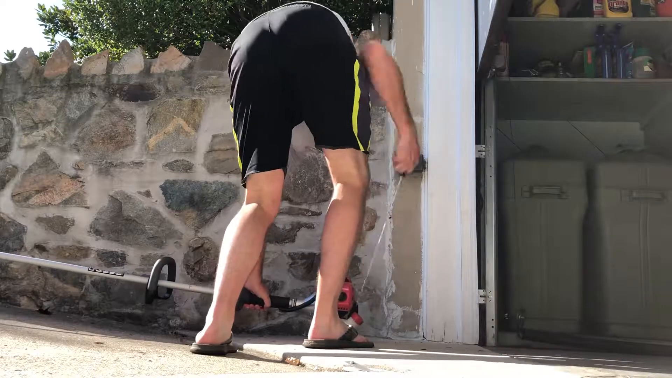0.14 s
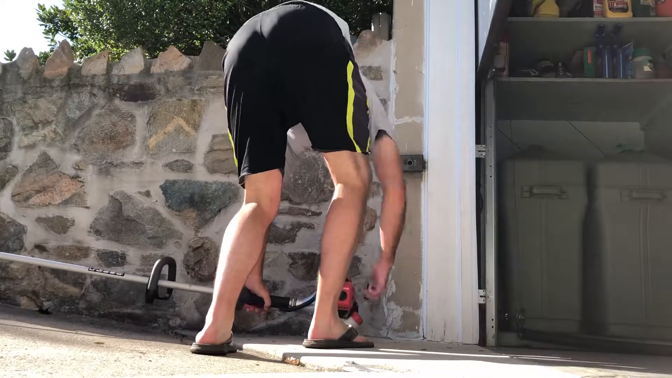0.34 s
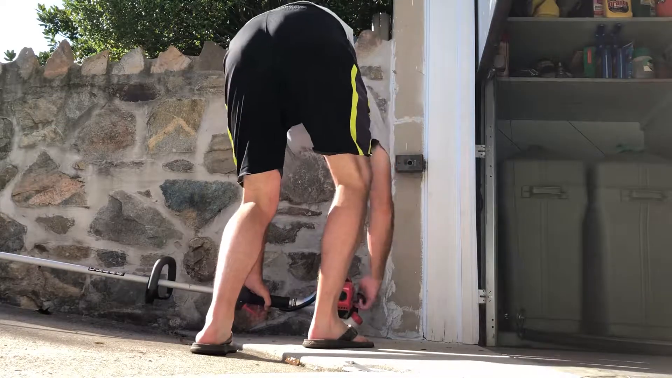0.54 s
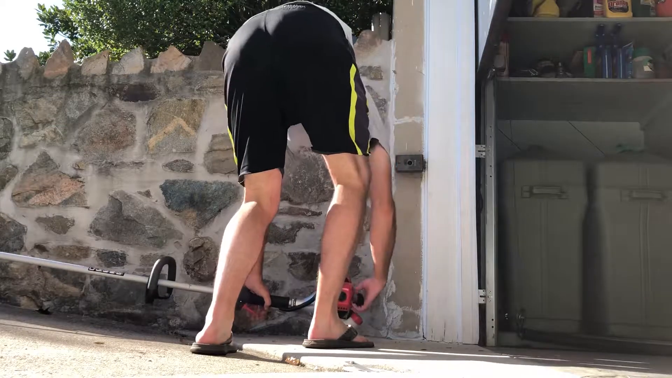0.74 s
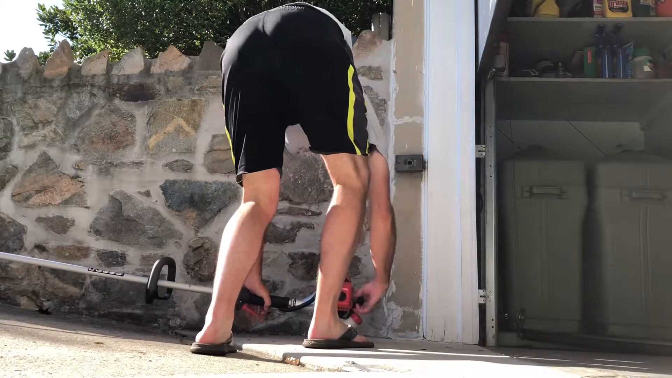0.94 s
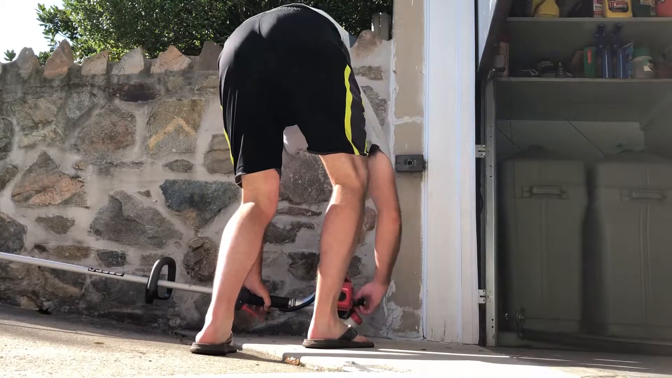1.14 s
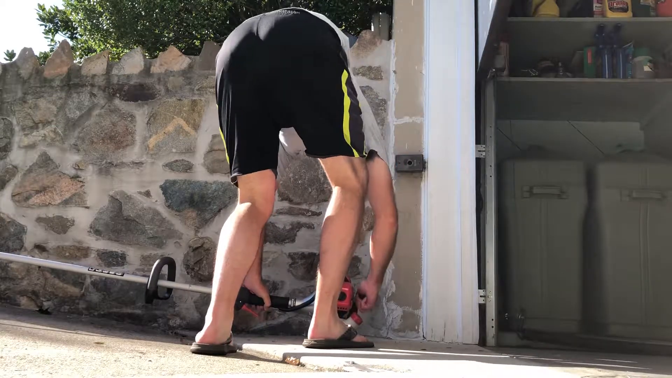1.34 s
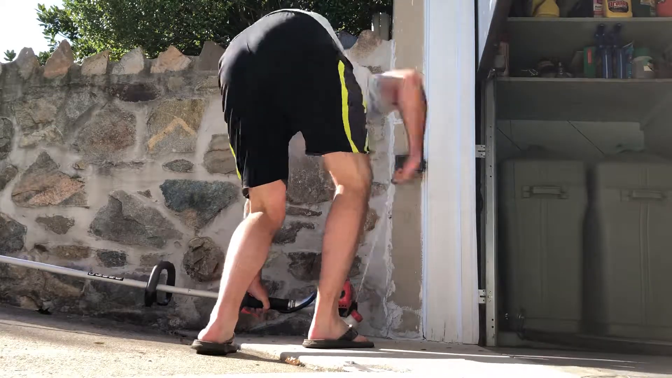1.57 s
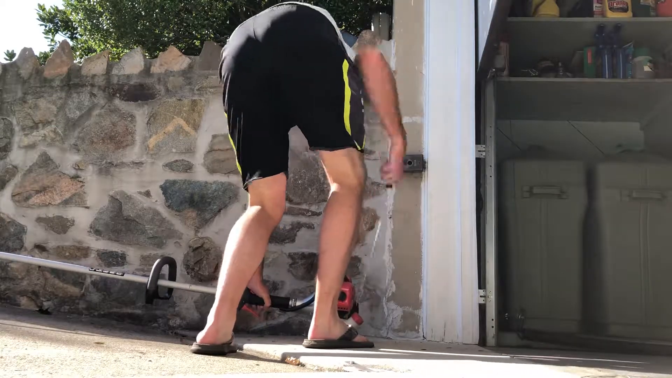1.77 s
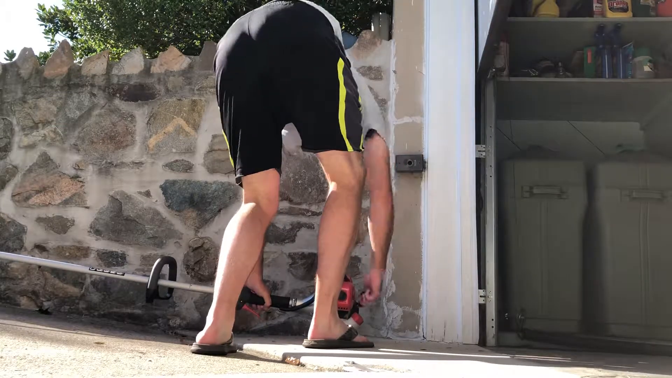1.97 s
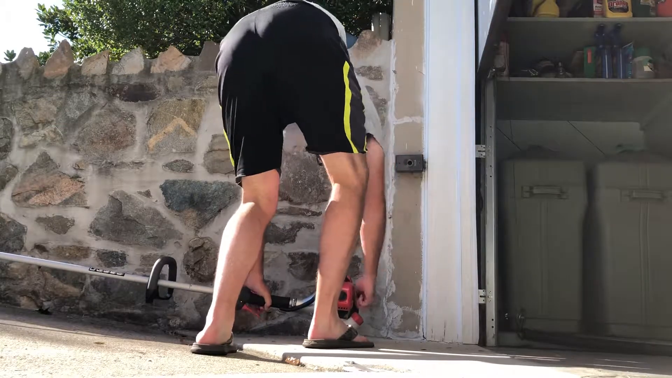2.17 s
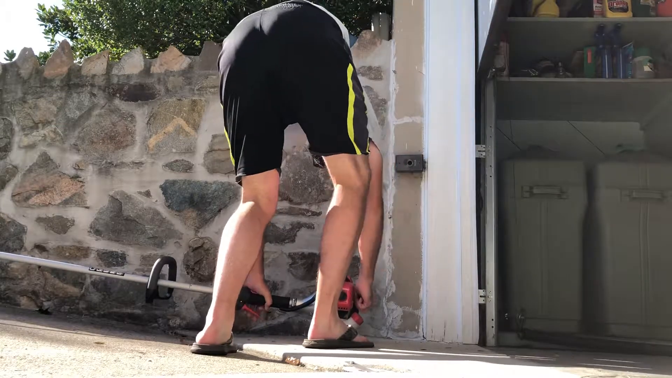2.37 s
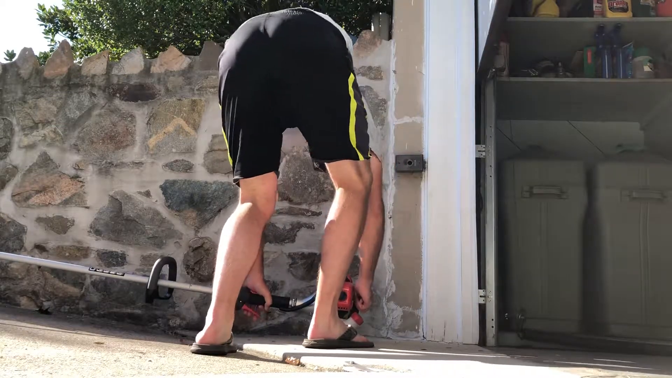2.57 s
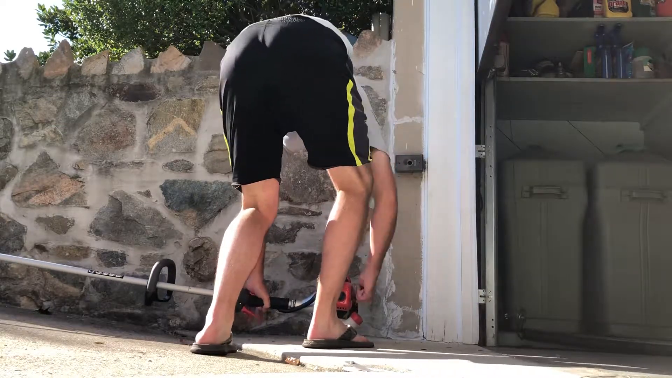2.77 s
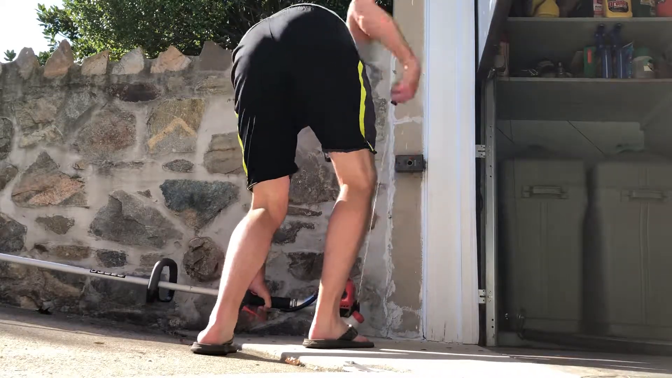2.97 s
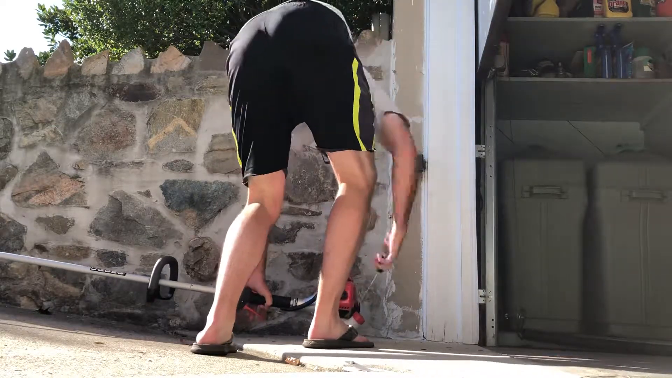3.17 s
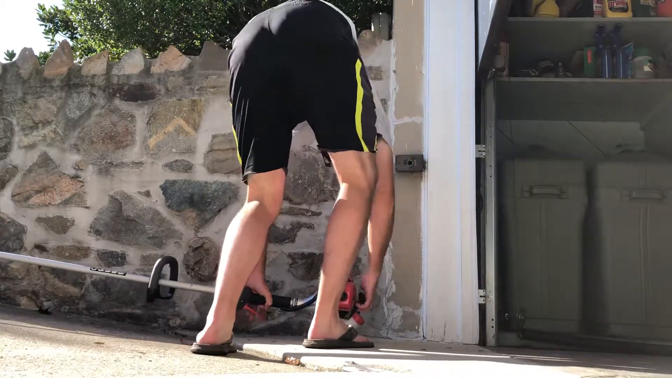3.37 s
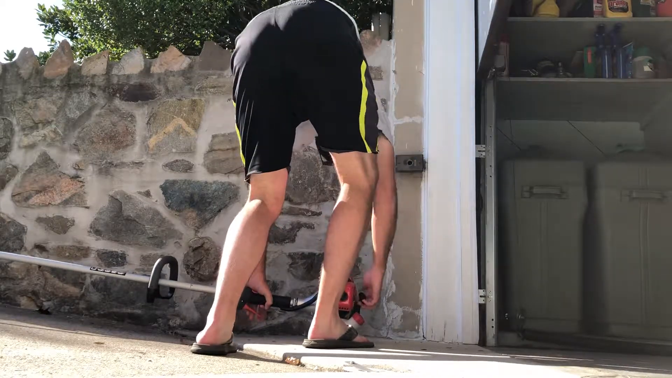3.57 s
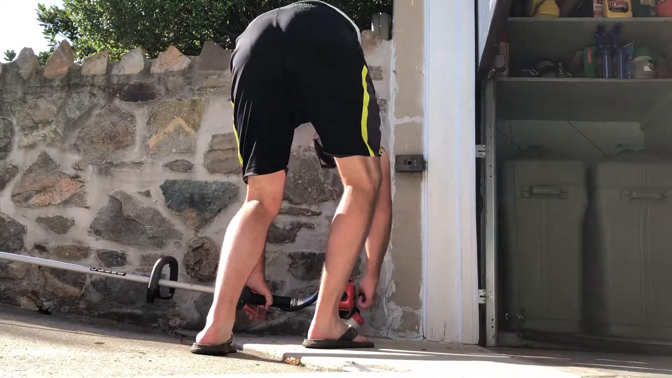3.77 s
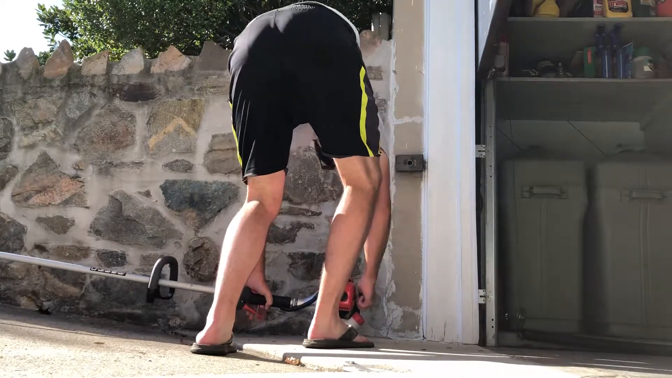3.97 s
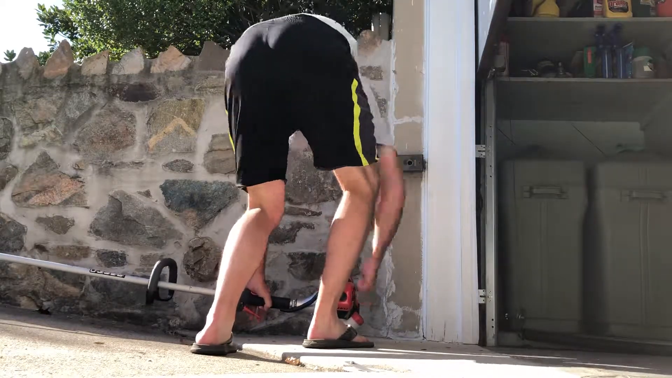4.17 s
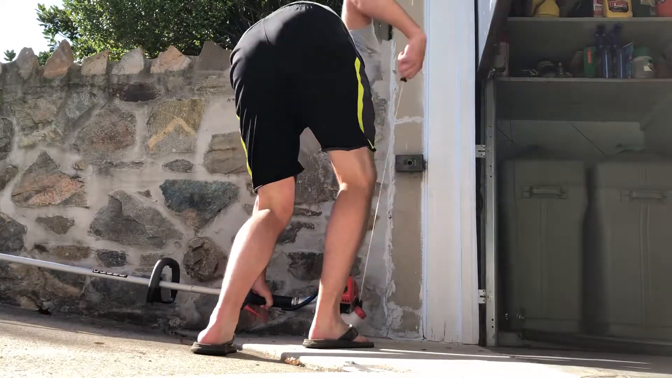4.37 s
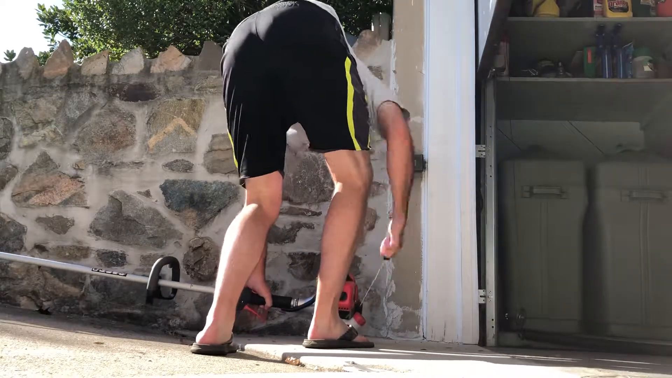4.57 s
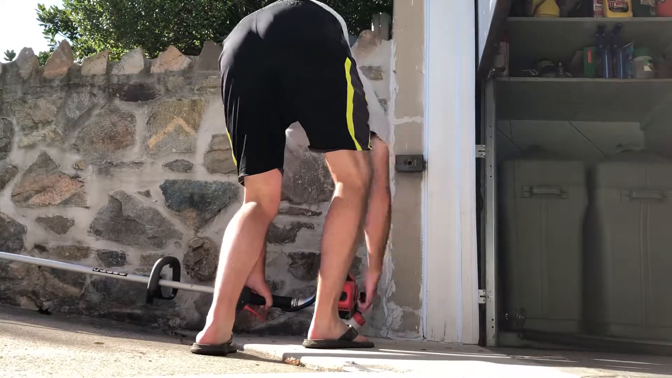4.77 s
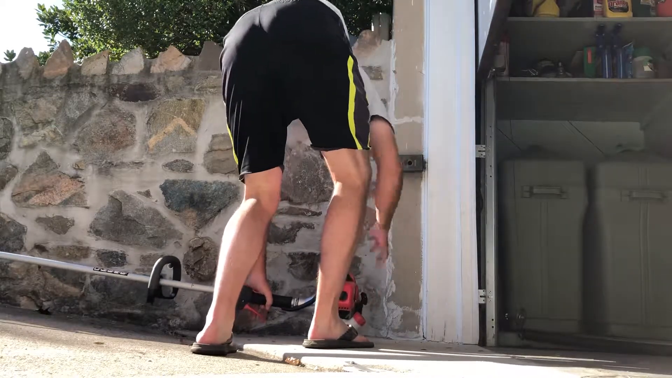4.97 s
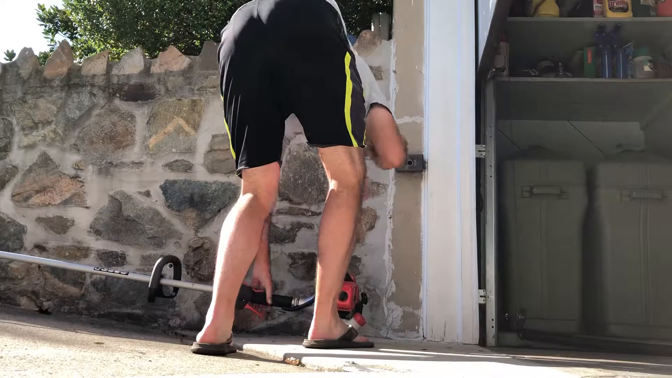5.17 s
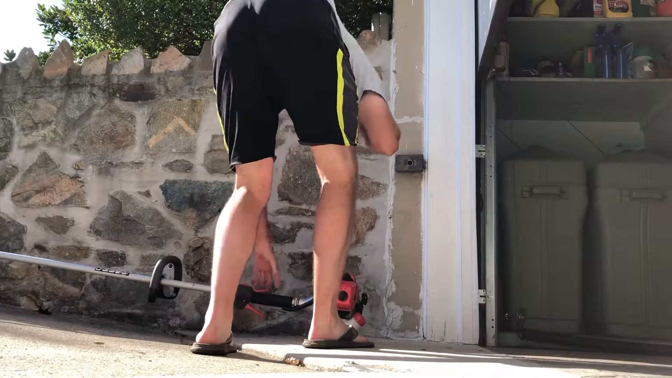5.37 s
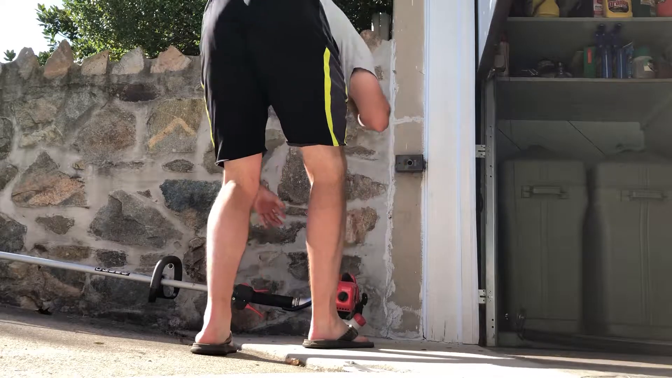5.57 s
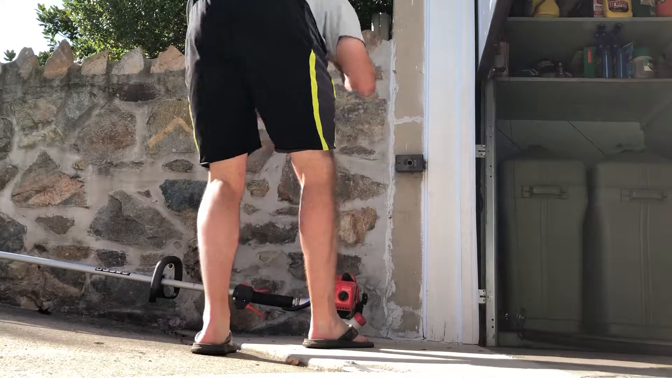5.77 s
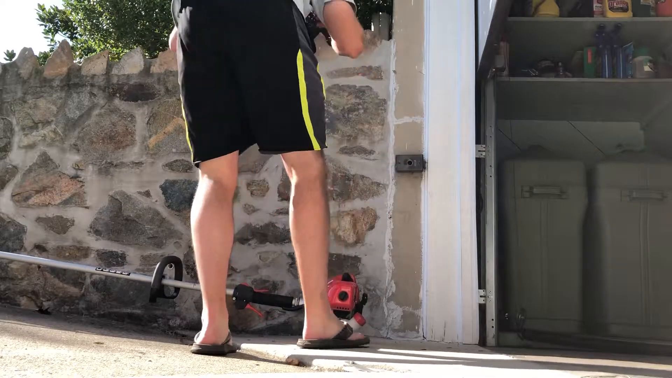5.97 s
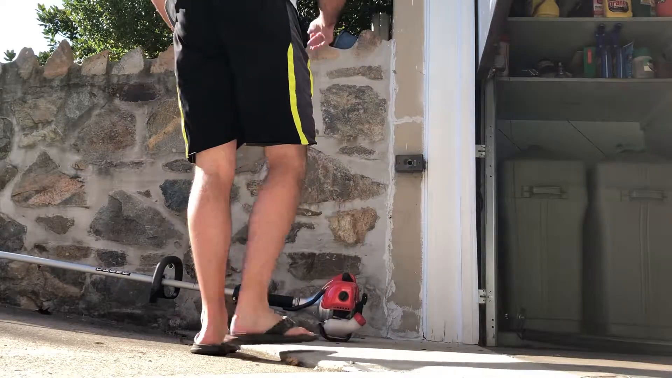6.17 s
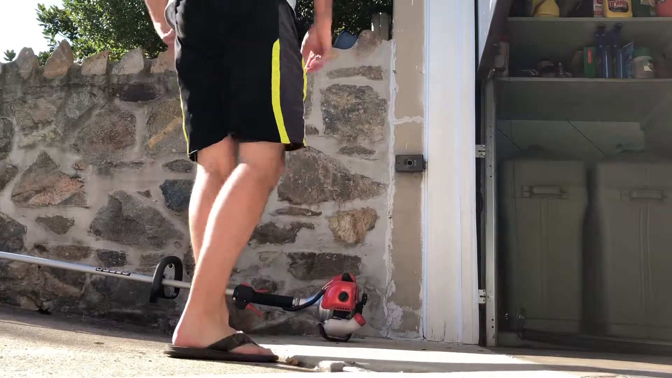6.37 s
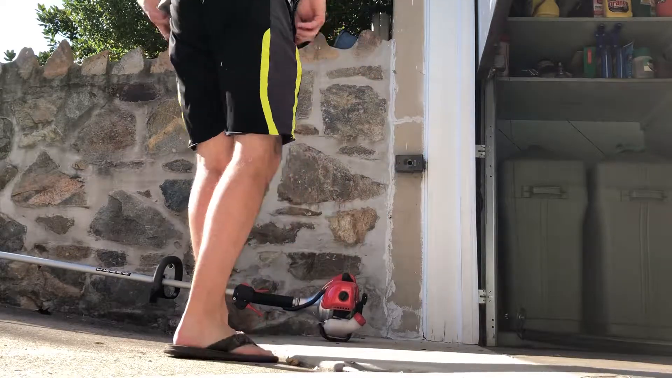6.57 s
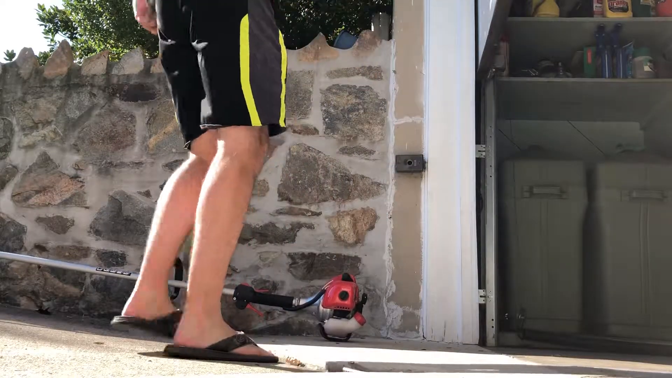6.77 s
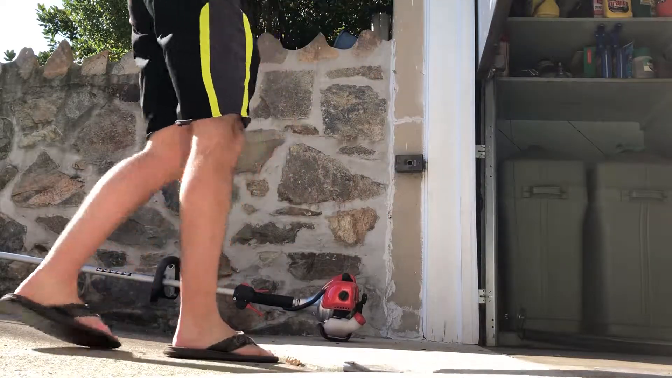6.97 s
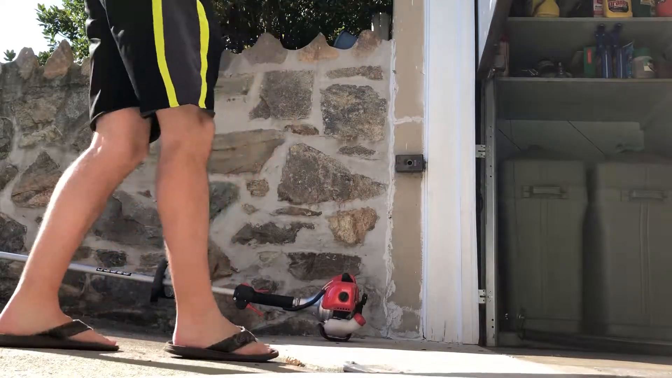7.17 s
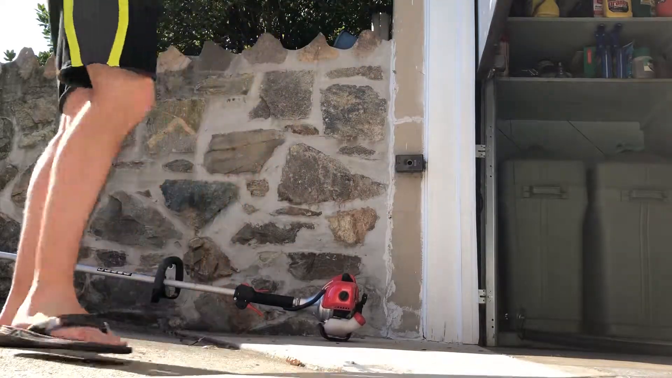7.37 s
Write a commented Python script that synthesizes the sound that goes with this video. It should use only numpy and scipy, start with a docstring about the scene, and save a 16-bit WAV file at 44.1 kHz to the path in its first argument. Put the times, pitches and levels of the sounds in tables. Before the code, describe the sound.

A small two-stroke engine is yanked by its cord three times, sputtering and dying with metallic clacks, then catches and idles in uneven, sharp pops.

```python
"""Between a stone wall and an open garage, a two-stroke string trimmer is pull-started on the ground.
Three pulls spin it up, it pops a few times and runs down with clacks of the starter; on the fourth it catches.
It idles unevenly: every turn puffs through muffler modes, only about every fifth fires with a sharp noise crack.
Cord and metal are coloured noise under envelopes; behind are rumble, a droning motor, an insect and a bird."""
import sys
import numpy as np
from scipy import signal
from scipy.fft import rfft, irfft, next_fast_len
from scipy.io import wavfile

SR = 44100
rng = np.random.default_rng(int(sys.argv[2]) if len(sys.argv) > 2 else 0)


def wrap_up_sound(samples):
    """Save the sound to the file named by the first command line argument, as 16-bit audio."""
    columns = np.atleast_2d(samples).T
    # keep every value between -1 and 1, then stretch to whole-number steps
    tamed = np.clip(columns, -1, 1)
    steps = np.round(tamed * 32767).astype(np.int16)
    wavfile.write(sys.argv[1], SR, steps)


N = 327663
TIME = np.arange(N) / SR


def from_db(db):
    """Decibels to gain."""
    return 10 ** (np.asarray(db) / 20)


def rms_one(x):
    """Scale to rms 1."""
    return x / np.sqrt(np.mean(x ** 2) + 1e-20)


def in_time(rows):
    """Each column of a curve at every sample, the first column being seconds."""
    s, *columns = np.transpose(rows)
    return [np.interp(TIME, s, c) for c in columns]


def cut(x, hz, kind, order=2):
    """Butterworth low- or high-pass."""
    sos = signal.butter(order, min(hz, .45 * SR), kind, fs=SR, output="sos")
    return signal.sosfilt(sos, x + 1e-18)


def drift(per_s):
    """Straight lines between standard normal draws; holds still after 2000 draws."""
    return np.interp(TIME * per_s, np.arange(2000), rng.standard_normal(2000))


def noise(spectrum):
    """Noise of a given colour, rms 1, falling steeply below its first point."""
    hz, db = np.transpose(spectrum)
    size = next_fast_len(N)
    f = np.maximum(np.arange(size // 2 + 1) * SR / size, 1)
    gain = from_db(np.interp(np.log(f), np.log(hz), db)) * np.minimum(f / hz[0], 1) ** 2
    white = rng.standard_normal(size)
    return rms_one(irfft(rfft(white) * gain, size)[:N])


def shifting(x, db, per_s, count=12):
    """The colour changes from moment to moment: each band has a drifting gain of its own; rms 1."""
    size = next_fast_len(N)
    spectrum = rfft(x, size)
    f = np.arange(len(spectrum)) * SR / size
    centres_hz = np.linspace(np.sqrt(1000), np.sqrt(15000), count) ** 2
    place = np.interp(f, centres_hz, np.arange(count))
    out = np.zeros(N)
    for k in range(count):
        band = irfft(spectrum * np.maximum(1 - abs(place - k), 0), size)[:N]
        out += band * from_db(db * drift(per_s))
    return rms_one(out)


def clicks(times, gains):
    """One impulse at each time."""
    return np.bincount(np.maximum(np.asarray(times) * SR, 0).astype(int), gains, N)[:N]


def ring(x, modes):
    """Parallel modes of alternating sign; a unit click rings each at its own level."""
    out = np.zeros(N)
    for k, (hz, db, t60) in enumerate(modes):
        radius = np.exp(-np.log(1000) / (t60 * SR))
        w = 2 * np.pi * hz / SR
        poles = [1, -2 * radius * np.cos(w), radius * radius]
        out += (-1) ** k * from_db(db) * signal.lfilter([.5, 0, -.5], poles, x + 1e-18)
    return out


def bursts(times, db, rise_s, fall_s):
    """An envelope that swells and dies away at each time."""
    out = np.zeros(N + SR)
    t = TIME[:SR // 5]
    for s, gain, rise, fall in np.broadcast(times, from_db(db), rise_s, fall_s):
        at = max(int(s * SR), 0)
        swell = np.minimum(t / rise, 1) ** 2
        out[at:at + len(t)] += gain * swell * np.exp(-np.maximum(t - rise, 0) / fall)
    return out[:N]


def ticking(per_s, db, spread_db, fall_s):
    """Envelope of tiny metal ticks at uneven times and strengths."""
    chance = rng.random((2000, 2))
    s = np.cumsum(2 * chance[:, 0]) / per_s
    heard = s < TIME[-1]
    return bursts(s[heard], db - spread_db * chance[heard, 1], rise_s=0.00023, fall_s=fall_s)


# Distant rumble. Each row: frequency in Hz, relative density in dB per Hz.
AIR_SPECTRUM = [(30, -44), (50, -16), (82, -2.5), (110, -8.5), (140, -3.5), (175, -10), (260, -12.5),
                (370, -22.5), (560, -21), (1020, -21), (2100, -42), (4600, -51), (7000, -56.5),
                (16000, -61)]


def rumble(level_db=-42.5):
    """Low-weighted air noise of slightly drifting level."""
    return from_db(level_db + drift(4.0)) * noise(AIR_SPECTRUM)


# Far motor, fading. Each row: time in seconds, level of the fundamental in dB before its drift.
DRONE_LEVEL = [(0, -40), (1.4, -43), (2.2, -41), (2.7, -44), (2.85, -65)]


def far_motor(drone_hz=140.5):
    """Partials at 1, 1.5 and 2 times a wavering pitch."""
    half_turn = np.pi * np.cumsum(drone_hz * (1 + .012 * drift(14))) / SR
    partials = np.sin(2 * half_turn) + .35 * np.sin(3 * half_turn) + .25 * np.sin(4 * half_turn)
    return from_db(in_time(DRONE_LEVEL)[0] + 2 * drift(9)) * partials


# Insect in the hedge. Each row: time in seconds, mid-chirp pitch in Hz, chirp peak in dB, both before drift.
INSECT_TRACK = [(0, 7900, -72), (1.5, 7780, -67.5), (2.15, 8000, -58), (2.4, 8080, -56),
                (2.46, 7800, -73.5)]


def insect(chirps_per_s=17, glide_hz=60, uneven_db=4):
    """A sine pulsed into chirps that each sag in pitch."""
    hz, db = in_time(INSECT_TRACK)
    phase = np.cumsum(chirps_per_s + drift(4.2)) / SR % 1
    pitch_hz = hz + glide_hz * (1 - 2 * phase) + 70 * drift(900)
    tone = np.sin(2 * np.pi * np.cumsum(pitch_hz) / SR)
    return from_db(db + uneven_db * drift(16)) * np.sin(np.pi * phase) ** 4 * tone


# Two blurred notes of a far bird. Each row: frequency in Hz, relative density in dB per Hz.
BIRD_SPECTRUM = [(2600, -25), (3100, 3), (3800, -12), (4700, -2), (5400, -25), (9000, -50)]
# Bird calls. Each entry: start in seconds.
BIRD_START_S = [1.17, 1.44, 2.27, 2.53]


def bird(level_db=-66):
    """Noise in two bands, swelling and dying at each call."""
    return noise(BIRD_SPECTRUM) * bursts(BIRD_START_S, level_db, rise_s=.03, fall_s=.075)


# Reflections off ground, wall and garage. Each row: delay in ms, level in dB.
REFLECTIONS = [(1.7, -14.5), (6.6, -16), (12.6, -18), (19.5, -15.5), (24, -17), (35.5, -13)]


def yard(x, tail_db=-8, t60_s=0.52, tail_low_hz=330, tail_high_hz=9000, build_s=0.004):
    """A few hard reflections, then the diffuse ring of the garage."""
    out = x.copy()
    for ms, db in REFLECTIONS:
        out += from_db(db) * np.interp(TIME - ms / 1000, TIME, x, left=0)
    t = TIME[:SR]
    decay = np.exp(-np.log(1000) * t / t60_s)
    tail = rng.standard_normal(SR) * decay * np.minimum(t / build_s, 1) ** 2
    tail = cut(tail / np.linalg.norm(tail), tail_low_hz, "high", order=1)
    tail = cut(tail, tail_high_hz, "low", order=1)
    return out + from_db(tail_db) * signal.fftconvolve(x, tail)[:N]


# Pulls of the cord. Each row: first stroke in seconds, last stroke in seconds, cord wound back in seconds,
# top speed in turns/s, drag in turns/s per s, rasp in dB before the cord gain.
CORD_PULLS = [(0.0176, 0.633, .79, 53.6, 150, -35.5), (1.638, 1.953, 2.05, 51.5, 149, -36.5),
              (2.921, 3.364, 3.44, 55.1, 119, -38), (4.339, 7.44, 4.42, 55, 115.5, -38.5)]


def since_pull(grip_s=.05):
    """At every sample: seconds since the first stroke of the current pull, and that pull's row."""
    pulls = np.array(CORD_PULLS)
    index = np.searchsorted(pulls[:, 0] - grip_s, TIME) - 1
    current = pulls[np.maximum(index, 0)]
    return np.maximum(TIME - current[:, 0], 0), current


# Firings of the charge. Each row: time in seconds, hiss in dB, bark in dB, both before the gains in cracks().
FIRED = [(0.2086, -12, -26.5), (0.2855, -7.5, -25), (0.31, -14, -37), (.3552, -23, -37), (.4289, -26, -33),
         (.484, -16.5, -28.5), (.5953, -30, -37), (3.1461, -4, -25.5), (3.3212, -11.5, -27),
         (4.4949, -8.5, -27.5), (4.595, -3.5, -24), (4.741, -7.5, -24.5), (4.8635, -7.5, -22),
         (4.993, -7, -25), (5.1141, -5, -25), (5.2324, -3.5, -24.5), (5.3451, -4, -27), (5.4581, -3.5, -24),
         (5.5764, -9.5, -24), (5.673, -6.5, -21.5), (5.794, -11.5, -30), (5.911, -8, -25.5),
         (6.0212, -2.5, -21.5), (6.1327, -8, -24), (6.2423, -2, -24.5), (6.349, -6, -21.5),
         (6.4554, -3.5, -21), (6.564, -5.5, -22.5), (6.6715, -7.5, -21), (6.7582, -7.5, -29.5),
         (6.8076, -4, -24.5), (6.8989, -5, -18.5), (6.993, -4, -25.5), (7.0807, -3, -20), (7.1499, -3, -22),
         (7.2384, -4, -30), (7.3311, -4, -22.5), (7.416, -4, -18)]
# Wandering idle speed. Each row: time in seconds, speed in turns/s.
IDLE_SPEED = [(4.74, 41.8), (4.9, 40), (5.2, 43.2), (5.8, 41.3), (6.4, 45.6), (6.9, 42), (7.43, 41.3)]
IDLE_FROM_S = 4.73


def crank_speed(tug_s=.043, tug_turns_per_s=10.43, kick_turns_per_s=9.1, stall_turns_per_s=14.7):
    """Turns/s: the tug spins the crank up, drag slows it, firings kick it on until it idles."""
    age, pull = since_pull()
    first, _, _, top, drag, _ = pull.T
    fired = np.sort(np.array(FIRED)[:, 0])
    kicks = np.searchsorted(fired, TIME) - np.searchsorted(fired, first)
    speed = top - tug_turns_per_s * np.maximum(1 - age / tug_s, 0)
    speed += kick_turns_per_s * kicks - drag * np.maximum(age - tug_s, 0)
    return np.where(TIME < IDLE_FROM_S, np.maximum(speed, stall_turns_per_s), in_time(IDLE_SPEED)[0])


def stroke_times(speed, surge=0.054, jitter_s=0.0003):
    """Whole turns fit between firings; at idle each firing kicks the crank, which then slows."""
    angle = np.cumsum(speed) / SR
    fired = np.array(FIRED)[:, 0]
    out = []
    for first, last, *_ in CORD_PULLS:
        marks = np.r_[first, fired[(fired > first) & (fired < last)], last]
        for a, b in zip(marks, marks[1:]):
            start, end = np.interp([a, b], TIME, angle)
            part = np.linspace(0, 1, max(round(end - start), 1), endpoint=False)
            idling = a > IDLE_FROM_S
            surged = part - idling * surge * part * (1 - part)
            out.extend(np.interp(start + (end - start) * surged, angle, TIME))
        out.append(last)
    return np.array(out) + jitter_s * rng.standard_normal(len(out))


def cord_level(take_up_s=0.0036, take_up_db_per_s=290, draw_s=.16, rewind_db=-42.5, fade_db_per_s=150):
    """Gain of the running cord: it swells into each pull, eases to the rewind and dies away."""
    out = np.zeros(N)
    for first, _, wound, _, _, db in CORD_PULLS:
        held = np.interp(TIME, [first, first + draw_s / 2, first + draw_s], [db, db, rewind_db])
        take_up = take_up_db_per_s * np.maximum(first - take_up_s - TIME, 0)
        fade = fade_db_per_s * np.maximum(TIME - wound, 0)
        out += from_db(held - take_up - fade)
    return out


# Cord rasp and piston metal. Each row: frequency in Hz, relative density in dB per Hz.
RASP_SPECTRUM = [(530, -31.5), (900, 7), (1040, -14.5), (1230, -3), (2040, -2.5), (3470, -0.5), (4740, -5),
                 (6330, -3.5), (8150, -12), (10200, -17.5), (11300, -8), (16000, -31.5)]


def cord(cord_db=-2.5, grain_db=4.0, colour_db=3.5):
    """The cord rasps through its eyelet and the ratchet ticks."""
    ratchet = ticking(per_s=90, db=10, spread_db=10.5, fall_s=.001)
    grains = from_db(cord_db + grain_db * drift(240))
    return shifting(noise(RASP_SPECTRUM), colour_db, 25) * cord_level() * (grains + ratchet)


# Clacks of the starter pawls and of the piston rocking back.
# Each row: start in seconds, bright part in dB, dull part in dB, both before the gains below.
CLACK_HITS = [(.0204, -31, -32), (.0828, -15.5, -30), (.6772, -18.5, -19.5), (0.7793, -19.5, -29.5),
              (0.912, -45, -38.5), (1.704, -20, -34), (1.723, -22, -27), (1.8783, -27, -31),
              (1.9984, -29, -44), (2.045, -29, -38), (2.0737, -34, -38), (2.102, -51, -35.5),
              (2.155, -53, -40), (2.804, -50, -49.5), (2.983, -16, -31), (3.385, -29.5, -35.5),
              (3.4016, -9.5, -19.5), (3.633, -52, -30.5), (3.65, -36, -40), (3.702, -23.5, -30),
              (3.8458, -49, -35), (4.338, -43, -31.5), (4.378, -32, -24.5), (4.399, -15.5, -33),
              (4.428, -20.5, -30), (4.508, -24, -27), (4.532, -30, -28)]
# Clacking metal. Each row: frequency in Hz, relative density in dB per Hz.
CLACK_SPECTRUM = [(530, -35), (900, -6.5), (1200, -5), (1970, -3), (3260, -1), (3590, -3), (3860, -2),
                  (4800, -7.5), (6330, 1.5), (7960, -16.5), (9310, -11), (15100, -13.5), (16000, -9.5)]


def clacks(bright_db=-5, dull_db=-1, rise_s=0.0028, fall_s=0.01, colour_db=3.5):
    """Short rattles of metal noise, the bright and dull parts levelled apart."""
    s, bright, dull = np.transpose(CLACK_HITS)
    metal = shifting(noise(CLACK_SPECTRUM), colour_db, 14)
    high = rms_one(cut(metal, 5000, "high")) * bursts(s, bright + bright_db, rise_s, fall_s)
    low = rms_one(cut(metal, 4200, "low")) * bursts(s, dull + dull_db, rise_s, fall_s)
    return high - low


# Piston and clutch clatter at idle. Each row: time in seconds, level in dB before gain and grain.
CLATTER_LEVEL = [(4.3, -100), (4.6, -44.5), (5.8, -47.5), (6.4, -52), (7.43, -49)]


def piston(strokes, slap_db=-39, clatter_db=-2.0, colour_db=3.5):
    """Each turn brings a slap of metal, over a grainy clatter."""
    slap = bursts(strokes, slap_db + 3 * rng.standard_normal(len(strokes)), rise_s=0.0034, fall_s=0.0073)
    grains = from_db(3.9 * drift(200)) + ticking(per_s=78, db=12.5, spread_db=12, fall_s=.0015)
    clatter = from_db(in_time(CLATTER_LEVEL)[0] + clatter_db) * grains
    return shifting(noise(RASP_SPECTRUM), colour_db, 40) * (slap + clatter)


# Knocks as the engine coughs and catches. Each row: time in seconds, click level in dB before the low-pass.
KNOCK_HITS = [(4.497, -28), (4.508, -15.5), (4.52, -11.5), (4.53, -31)]
# Housing modes. Each row: frequency in Hz, level in dB, t60 in seconds.
HOUSING_MODES = [(699.4, -1, 0.035), (884, -4, 0.036), (1030, -4.5, 0.065), (1390, -17, 0.023),
                 (1800, -15, .03), (2230, -14, .03)]


def housing_knocks():
    """Softened clicks ring the housing as the engine catches."""
    s, db = np.transpose(KNOCK_HITS)
    return ring(cut(clicks(s, from_db(db)), 2500, "low"), HOUSING_MODES)


# Cooling fins and muffler shell. Each row: frequency in Hz, level in dB before the coupling,
# t60 in seconds before the cap.
FIN_MODES = [(1850, -7, 0.048), (2450, -14, 0.009), (3240, -7, 0.084), (3710, 6.5, 0.11), (5280, -5, 0.076),
             (6440, 6, 0.076), (6400, -29, 0.021), (6740, 4.5, 0.18), (9490, -7, .04), (10000, 4.5, 0.086),
             (12300, 4, .05), (15100, -4, 0.053)]


def fins(sharp, coupling_db=-47, longest_t60_s=.075, vary_db=2):
    """Sharp sounds wake the metal's short-lived modes in a drifting mix."""
    out = np.zeros(N)
    for k, (hz, db, t60) in enumerate(FIN_MODES):
        mode = ring(sharp, [(hz, db, min(t60, longest_t60_s))])
        out += (-1) ** k * mode * from_db(vary_db * drift(12))
    return from_db(coupling_db) * out


# Gulps of air as the piston rocks to rest. Each row: time in seconds, click level in dB before low-passes.
GULP_HITS = [(.68, 11), (.733, 8.5), (.752, 7.5), (0.798, 4.5), (2.005, 0), (3.407, 11), (3.65, 11.5),
             (3.707, 0)]
# Muffler and air box as turns puff through. Each row: frequency in Hz, level in dB, t60 in seconds.
PUFF_MODES = [(82.8, -34.5, 0.06), (132.6, -32.5, 0.1), (184, -33.5, 0.15), (237.7, -24.5, 0.077),
              (274.2, -27, 0.15), (351.9, -31.5, 0.18), (455, -22, 0.026), (536, -19.5, 0.016),
              (763, -24.5, 0.016), (1242, -37.5, 0.043)]
# The same cavities under a burning charge. Each row: frequency in Hz, level in dB, t60 in seconds.
THUMP_MODES = [(78, 3, 0.096), (131.3, -4.5, 0.036), (186, -1.5, 0.0825), (241, 4.5, 0.082),
               (259, -7, 0.027), (500, 19, 0.011), (725, 18, 0.0094), (1146, 5.5, 0.029), (1560, 1, 0.0085)]
USUAL_TURNS_PER_S = 42


def puffs(strokes, speed, uneven_db=0.5, puff_db=29, puff_hz=1200, rush_db=-6):
    """Every turn lets out a puff and a rush of gas, harder when fast and in the first strokes of a pull."""
    fresh_db = 4 * np.exp(-since_pull()[0] / 0.093)
    flow_db = -27 + 0.0644 * (speed - USUAL_TURNS_PER_S) + fresh_db
    strength = np.interp(strokes, TIME, flow_db) + uneven_db * rng.standard_normal(len(strokes))
    gulp_s, gulp_db = np.transpose(GULP_HITS)
    pulses = clicks(strokes, from_db(strength + puff_db))
    pulses += cut(clicks(gulp_s, from_db(gulp_db)), 170, "low")
    rush = noise([(130, -8.0), (180, -1), (255, 7.0), (320, -6.0), (480, -6.0), (720, -7), (950, -21.0),
                  (1230, -11.5), (1600, -22.0), (6000, -37)])
    rush *= bursts(strokes, strength + rush_db, rise_s=0.0029, fall_s=0.018)
    return ring(cut(pulses, puff_hz, "low"), PUFF_MODES) + rush


def thumps(speed, thump_db=-10, thump_hz=1900, lag_s=0.00068, boom_db=-10, boom_db_per_turn_per_s=.35):
    """A firing thumps the cavities and booms on in the wall corner, both harder with crank speed."""
    s = np.array(FIRED)[:, 0]
    faster = speed[(s * SR).astype(int)] - USUAL_TURNS_PER_S
    db = -17 + 0.27 * faster
    pulses = clicks(s + lag_s, from_db(db + thump_db))
    boom = noise([(130, -11), (190, 1.5), (215, 5), (255, 6.5), (320, -9.0), (450, -5.5), (900, -35.0),
                  (3000, -56.5)])
    boom *= bursts(s, db + boom_db + boom_db_per_turn_per_s * faster, rise_s=0.017, fall_s=0.043)
    return ring(cut(pulses, thump_hz, "low"), THUMP_MODES) + boom


def exhaust(strokes, speed):
    """Puffs of every turn and thumps of every firing, without the deepest bass."""
    return cut(puffs(strokes, speed) + thumps(speed), 53, "high")


# Gas crack. Each row: frequency in Hz, relative density in dB per Hz.
CRACK_SPECTRUM = [(1200, -9), (1700, -11), (2000, -9), (2900, -1), (3900, -9), (4800, -10.5), (6300, -0.5),
                  (7700, -8), (9400, -2.5), (11200, -0.5), (12800, -3.5), (14800, -4), (16000, 0)]


def cracks(hiss_db=-4, bark_db=4, lead_s=0.0019, grain_db=2, colour_db=3.0, after_db=-17):
    """Hot gas tears out of the port for a few milliseconds at each firing, over a softer, longer tail."""
    s, hiss, bark = np.transpose(FIRED)
    gas = shifting(noise(CRACK_SPECTRUM), colour_db, 14)
    top = rms_one(cut(gas, 7870, "high"))
    top *= bursts(s - lead_s, hiss + hiss_db, rise_s=0.0026, fall_s=0.0047)
    swell = bursts(s - lead_s, bark + bark_db, rise_s=0.0033, fall_s=0.0036)
    swell += bursts(s - 3 * lead_s, bark + bark_db + after_db, rise_s=0.00086, fall_s=0.055)
    low = rms_one(cut(gas, 4900, "low")) * swell
    return (top - low) * from_db(grain_db * drift(500))


def scene():
    """The engine in its yard; all sharp sounds set its metal ringing."""
    background = rumble() + far_motor() + insect() + bird()
    speed = crank_speed()
    strokes = stroke_times(speed)
    sharp = cord() + clacks() + piston(strokes) + cracks()
    engine = exhaust(strokes, speed) + sharp + fins(sharp) + housing_knocks()
    return (yard(engine) + background)[None]


def record(dry, cutoff_hz=15900):
    """Peaks clip at full scale, then a steep low-pass cuts the top."""
    low_pass = signal.ellip(10, .2, 70, cutoff_hz, fs=SR, output="sos")
    return signal.sosfilt(low_pass, np.clip(dry, -1, 1))


dry = scene()
out = record(dry)
wrap_up_sound(out)
```